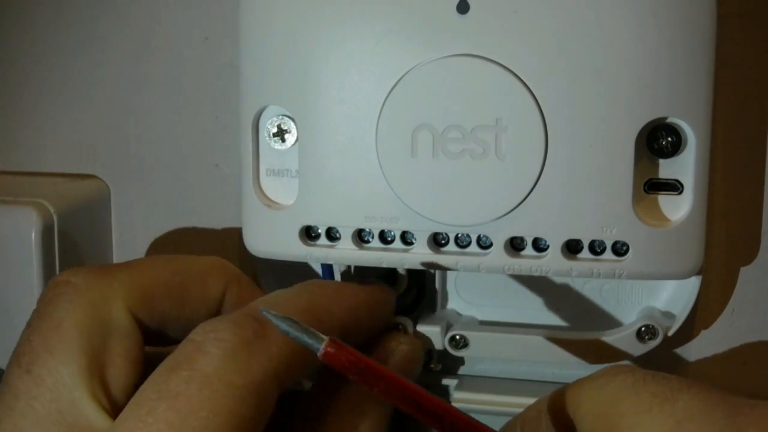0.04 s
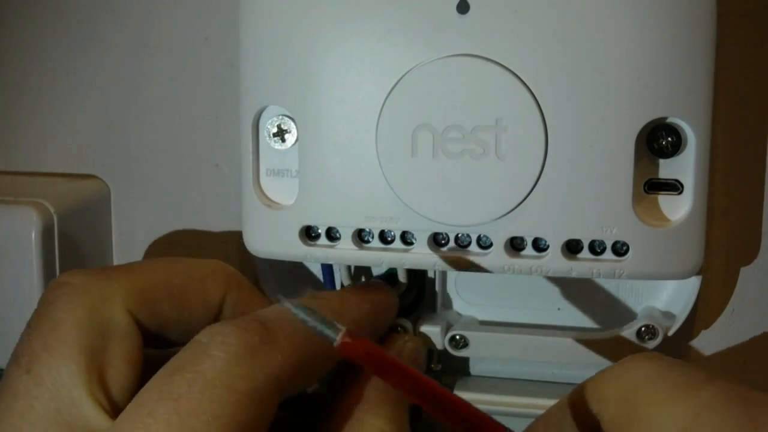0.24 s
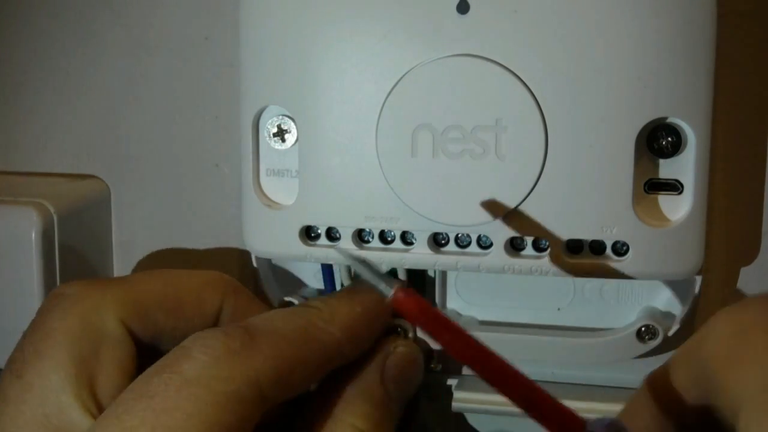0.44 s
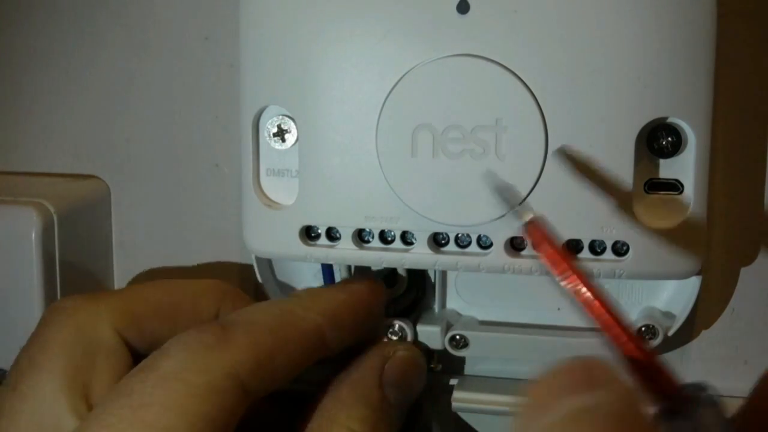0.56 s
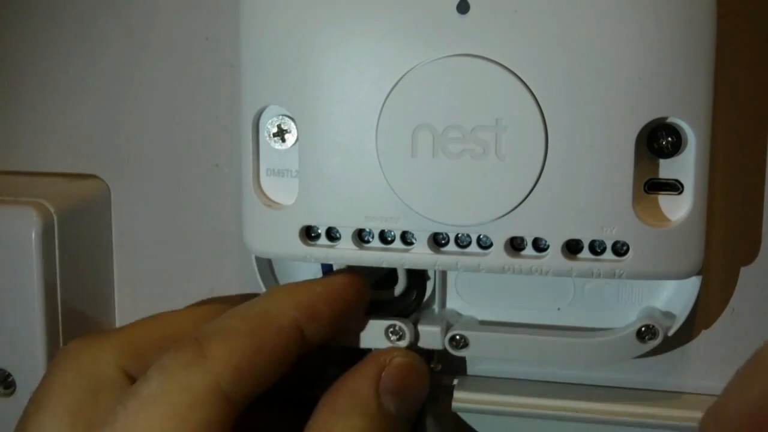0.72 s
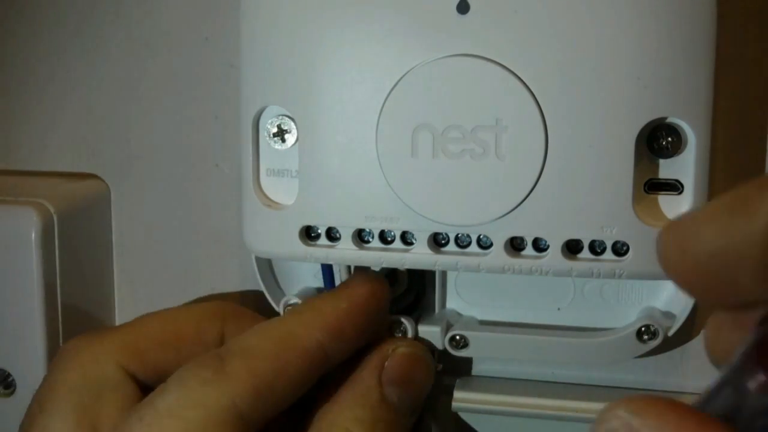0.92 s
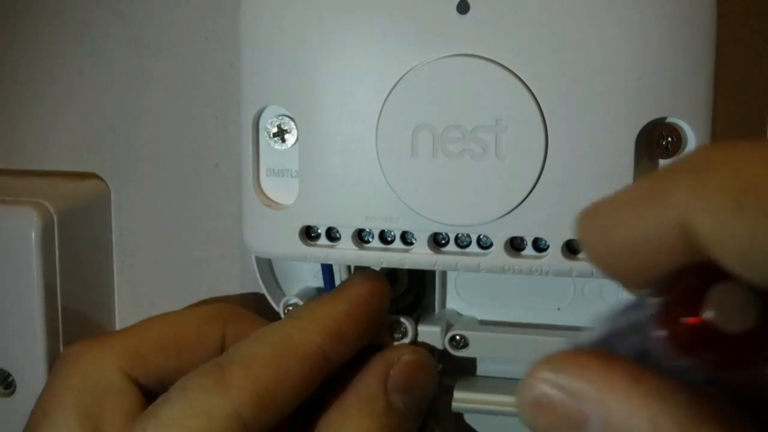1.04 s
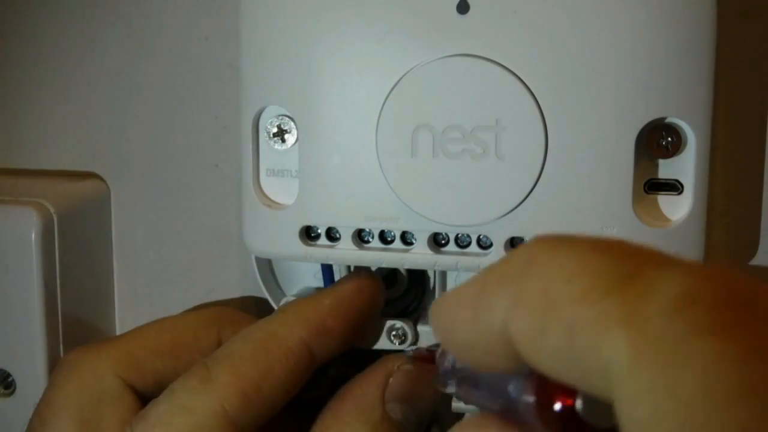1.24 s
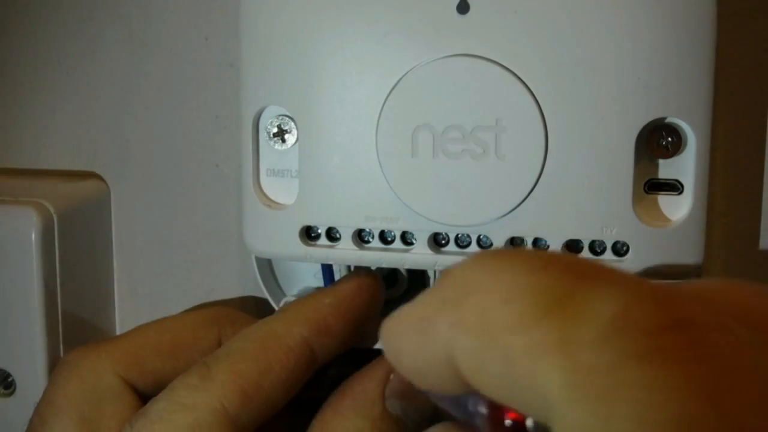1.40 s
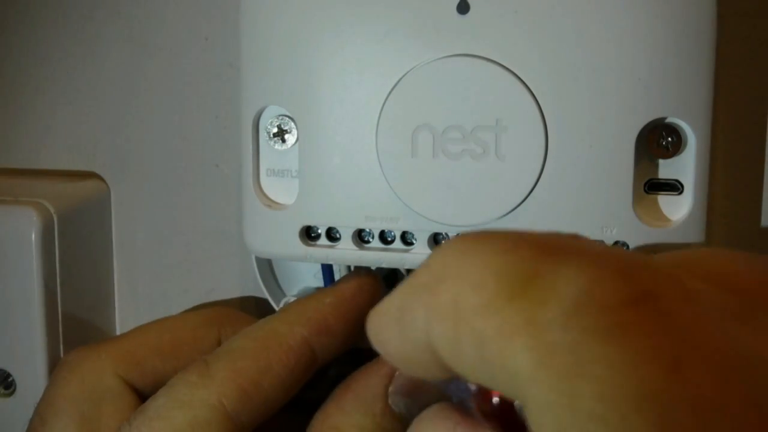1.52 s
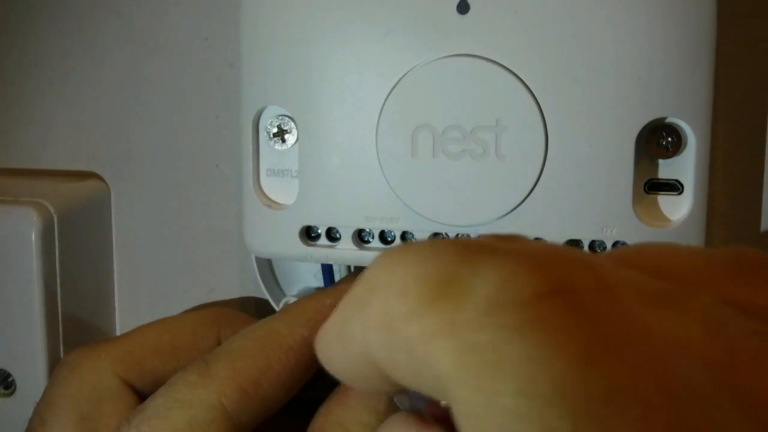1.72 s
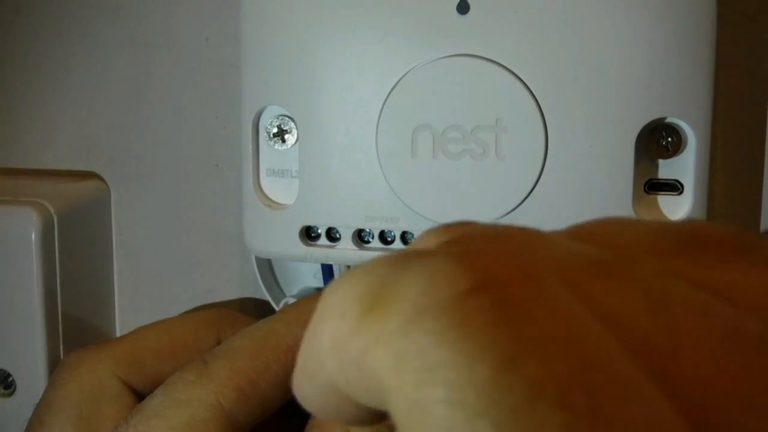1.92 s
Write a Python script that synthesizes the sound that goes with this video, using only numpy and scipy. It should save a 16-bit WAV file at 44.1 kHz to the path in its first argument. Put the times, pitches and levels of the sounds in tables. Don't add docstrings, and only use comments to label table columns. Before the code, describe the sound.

Close microphone in a small quiet indoor room: a plastic clamp snaps loudly, fingers and screwdriver rub faintly, a screw squeaks barely, another duller clack follows, then little ticks end it over soft hiss.

```python
import sys
import numpy as np
from scipy import signal
from scipy.io import wavfile
from scipy.ndimage import uniform_filter1d

SR = 44100
rng = np.random.default_rng(int(sys.argv[2]) if len(sys.argv) > 2 else 0)


def boost_factor(decibels):
    exponent = np.asarray(decibels, float) / 20
    return 10 ** exponent


def output_pcm(signal):
    pcm = np.clip(np.atleast_2d(signal).T, -1, 1) * 32767
    wavfile.write(sys.argv[1], SR, np.round(pcm).astype(np.int16))


N = 85995

# (frequency [Hz], density [dB per Hz])
HISS_SPECTRUM = [(15, -38), (25, -11.5), (66, -5), (127, -13.5), (170, -9), (277, -15.5), (354, -16.5),
                 (1480, -21.5), (16000, -33)]
# (frequency [Hz], width [Hz], level [dB])
APPLIANCE_HUM = [(61, 10, -67), (170, 20, -69), (1550, 200, -65)]
CONTACT_TIMES = [.0226, .122, .1245, .1253, .2112, .3315, .3717, .4015, .8217, .9682, 1.062, 1.145, 1.271,
                 1.2847, 1.85, 1.894, 1.9228, 1.937, 1.913, 1.9305]
# (peak [dB], share of hollow box [dB], brightness [dB per octave])
CONTACT_COLOURS = [(-34, -10, .1), (-25, -6, 2), (-7, -10, 0), (0, -11, -1.5), (-34, -6, .1),
                   (-46, -3, -2.5), (-46, 8, -6), (-43, -5, -3), (-11, 6, -.5), (-26, 3, -5), (-44, 9, -3),
                   (-37, -8, .1), (-44, -3, -3), (-28.5, -8, -6), (-34.5, -9, -6), (-29.5, -6, -6),
                   (-30, -13, -6), (-31, -13, -4), (-33, -13, -5), (-35, -13, -6)]
# (frequency [Hz], level [dB])
CLAMP_MODES = [(4900, -14.5), (5400, -16.5), (6000, -12.5), (6620, -6), (7340, -4.5), (7800, -2.5),
               (8300, -6), (8900, -1), (9700, -8.5), (10400, -6), (11200, -6), (12200, -17), (13300, -12.5),
               (14700, -20)]
# (frequency [Hz], level [dB])
BOX_MODES = [(330, -37.5), (450, -33.5), (720, -23), (950, -25), (1230, -21.5), (1620, -27.5), (2000, -32),
             (2650, -15.5), (3100, -18.5), (3630, -19), (4300, -18)]
# (frequency [Hz], t60 [s])
ROOM_DECAY = [(300, 0.46), (720, 0.32), (1200, 0.11), (2800, 0.16), (7300, 0.15), (15000, .11)]
# (time [s], length [s], level [dB], centre [Hz], width [Hz])
RUB_STROKES = [(.06, .061, -50.5, 7000, 6001), (.065, 0.011, -48, 860, 490),
               (.335, 0.08, -53.5, 7860, 3050), (.425, 0.044, -49.5, 8370, 1340),
               (.43, 0.045, -53.5, 3670, 2420), (.556, 0.028, -49.5, 1520, 2560),
               (.67, 0.14, -47, 7760, 4300), (.96, 0.119, -52, 7450, 8001), (.95, 0.39, -57, 1080, 1120),
               (1.11, 0.14, -54, 8400, 5730), (1.93, .05, -44, 6830, 3002), (.47, 0.135, -55, 7000, 5000)]
# (time [s], length [s], level [dB], frequency [Hz], width [Hz])
SCREW_SQUEALS = [
    (.66, .16, -58, 3010, 120),
    (.7, .12, -62, 3200, 150),
    (.675, .08, -59, 7140, 200),
    (.69, .08, -62, 9050, 250),
    (1.01, .05, -64, 10900, 200),
]
# (time [s], frequency [Hz], level [dB], t60 [s])
SCREW_PINGS = [
    (1.171, 5100, -46, .025),
    (1.218, 5250, -43, .03),
    (1.063, 760, -48, .06),
    (.07, 800, -50, .06),
    (.127, 735, -37, .12),
    (.9685, 5100, -38, .02),
]
# (time [s], level [dB])
STEEL_TAP = (.557, -49.5)
# (frequency [Hz], level [dB], t60 [s])
BLADE_MODES = [(2223, -1, .22), (7682, 0.1, .18), (9350, -5, .12), (9663, -6, .12), (10610, -3, .17),
               (11400, -6, .08)]
# (time [s], length [s], level [dB], frequency [Hz])
WALL_BOOMS = [(.44, .19, -53, 62), (.83, .58, -53.5, 61), (.73, .16, -50.5, 91), (.71, .2, -56, 175),
              (1.13, .06, -52, 99), (1.14, .11, -53, 168), (1.27, .1, -50, 101), (1.27, .09, -57, 158),
              (1.44, .14, -59, 170), (.57, .06, -59, 395), (.85, .06, -54, 685), (.84, .06, -57, 270),
              (.85, .05, -58, 450), (1.86, .06, -60, 165)]


def amp_at(points, hz):
    table_hz, value = np.array(points).T
    return np.interp(np.log(hz), np.log(table_hz), value)


def rms_one(x):
    return x / np.sqrt(np.mean(x ** 2) + 1e-20)


def ring(clicks, hz, t60):
    radius = boost_factor(-60 / (t60 * SR))
    angle = 2 * np.pi * hz / SR
    poles = [1, -2 * radius * np.cos(angle), radius * radius]
    return signal.lfilter([0, np.sin(angle)], poles, clicks + 1e-18)


def resonate(x, hz, width_hz):
    t60 = np.log(1000) / np.pi / width_hz
    for _ in range(2):
        x = ring(x, hz, t60)
    return rms_one(x)


def bands(size):
    edges = 22 * 2 ** (np.arange(30) / 3)
    white = rng.standard_normal((2, size))
    for k, (low, high) in enumerate(zip(edges, edges[1:])):
        band = signal.butter(2, [low, high], "band", fs=SR, output="sos")
        yield np.sqrt(low * high), signal.sosfilt(band, white[k % 2])


def room_tone():
    white = rng.standard_normal(N)
    hiss = sum(boost_factor(amp_at(HISS_SPECTRUM, hz)) * band for hz, band in bands(size=N + SR))
    hiss = rms_one(hiss[SR:])
    hum = sum(boost_factor(db) * resonate(white, hz, width_hz) for hz, width_hz, db in APPLIANCE_HUM)
    return boost_factor(-52) * hiss + hum


def diffuse_echoes(clicks, hz, noise):
    level_db, onset_s = -31.5, .0015
    build = np.exp(-1 / (onset_s * SR))
    die = boost_factor(-2 * 60 / (amp_at(ROOM_DECAY, hz) * SR))
    poles = np.convolve([1, -die], [1, -build])
    power = signal.lfilter([1], poles, clicks ** 2 + 1e-30) * (1 - build)
    return boost_factor(level_db) * np.sqrt(power) * noise


def clamp():
    chatter_s, chatter_loss_db = .0011, 2.2
    contact_db = -.5
    ring_s, ring_cycles = .002, 11
    s = np.array(CONTACT_TIMES)[:, None]
    db, box_db, bright_db = np.array(CONTACT_COLOURS).T[:, :, None]
    luck = rng.standard_normal((len(s), 120))
    diffuse = rng.standard_normal(N)
    bounce = np.arange(4)
    delay = chatter_s * bounce * (1 + .25 * np.tanh(luck[:, :4]))
    at = ((s + delay) * SR).astype(int)
    out = np.zeros(N)
    for m, (hz, mode_db) in enumerate(CLAMP_MODES + BOX_MODES):
        in_box = m >= len(CLAMP_MODES)
        colour_db = box_db if in_box else bright_db * np.log2(hz / 8000)
        scatter_db = 2 * luck[:, 4 + 4 * m:8 + 4 * m]
        clicks = np.zeros(N)
        clicks[at] = boost_factor(db + contact_db + mode_db + colour_db - chatter_loss_db * bounce + scatter_db)
        echoes = diffuse_echoes(clicks, hz, np.roll(diffuse, 997 * m))
        direct = clicks * (-1) ** m
        out += ring(direct + echoes, hz, ring_s + ring_cycles / hz)
    return signal.sosfilt(signal.butter(4, 280, "high", fs=SR, output="sos"), out)


def fade(s, length, fade_s):
    t = np.arange(N) / SR
    since_on = t - s + fade_s / 2
    until_off = s + length + fade_s / 2 - t
    openness = np.clip(np.minimum(since_on, until_off) / fade_s, 0, 1)
    return np.sin(openness * np.pi / 2) ** 2


def friction():
    grains_per_s, fade_s = 3500, .025
    slips = (rng.random(N) < grains_per_s / SR) * rng.standard_normal(N)
    drive = slips + 0.22 * rng.standard_normal(N)
    out = np.zeros(N)
    for s, length, db, hz, width_hz in RUB_STROKES + SCREW_SQUEALS:
        shape = fade(s, length, fade_s)
        sound = shape * resonate(drive, hz, width_hz)
        out += boost_factor(db) * sound * np.sqrt(np.sum(shape ** 2) / np.sum(sound ** 2))
    return out


def steel():
    tap_s, tap_db = STEEL_TAP
    tap = [(tap_s, hz, tap_db + mode_db, t60) for hz, mode_db, t60 in BLADE_MODES]
    out = np.zeros(N)
    for s, hz, db, t60 in tap + SCREW_PINGS:
        click = 1. * (np.arange(N) == int(s * SR))
        out += boost_factor(db) * ring(click, hz, t60)
    return out


def booms():
    waver_depth, fade_s = 0.0307, .05
    drift = rng.standard_normal(N)
    for _ in range(2):
        drift = uniform_filter1d(drift, size=1500)
    turns = np.cumsum(1 + waver_depth * rms_one(drift)) / SR
    out = np.zeros(N)
    for s, length, db, hz in WALL_BOOMS:
        out += boost_factor(db + 5.0) * fade(s, length, fade_s) * np.sin(2 * np.pi * hz * turns)
    return out


def scene():
    return (room_tone() + clamp() + friction() + steel() + booms())[None]


def band_limit(x):
    return signal.sosfilt(signal.butter(12, 16540, fs=SR, output="sos"), x)


def record(dry):
    low_pass = signal.cheby2(10, 50, 16250, fs=SR, output="sos")
    mix = signal.sosfilt(low_pass, dry)
    return band_limit(mix)


dry = scene()
out = record(dry)
output_pcm(out)
```